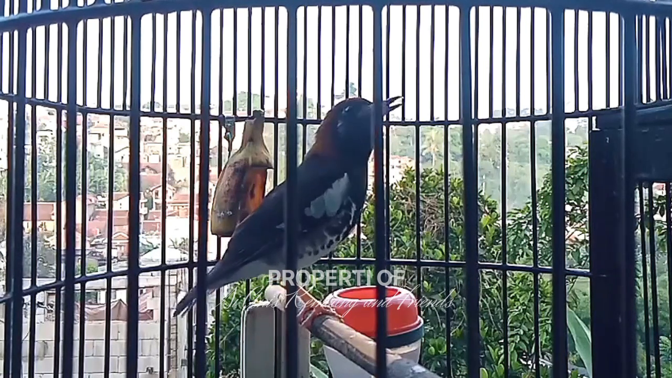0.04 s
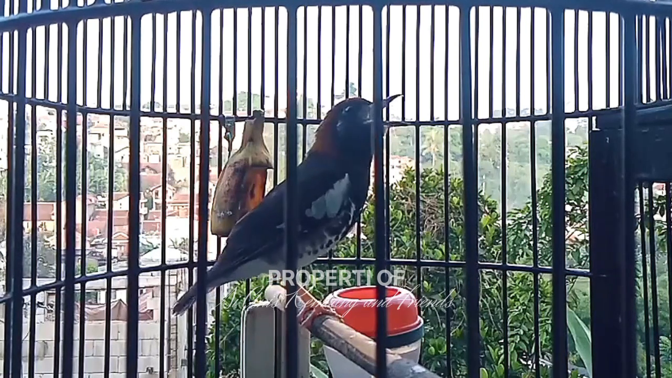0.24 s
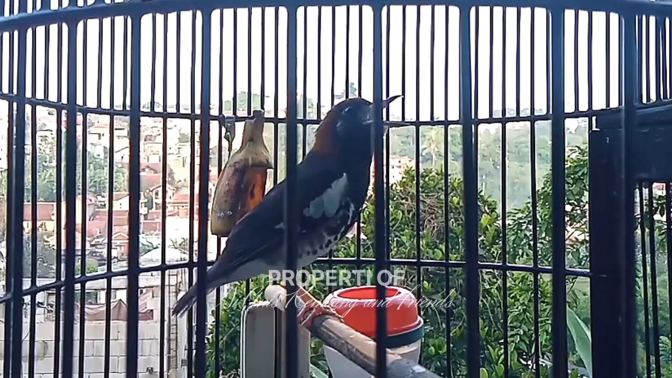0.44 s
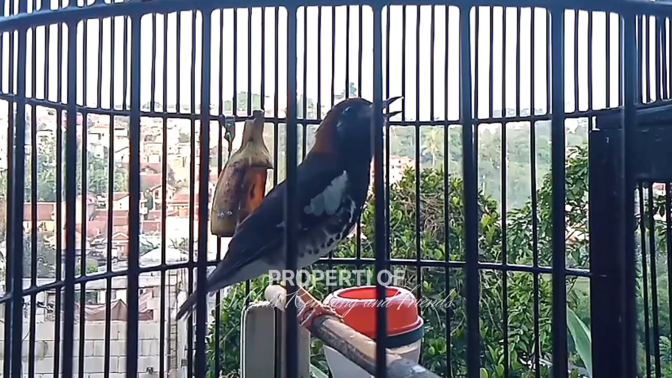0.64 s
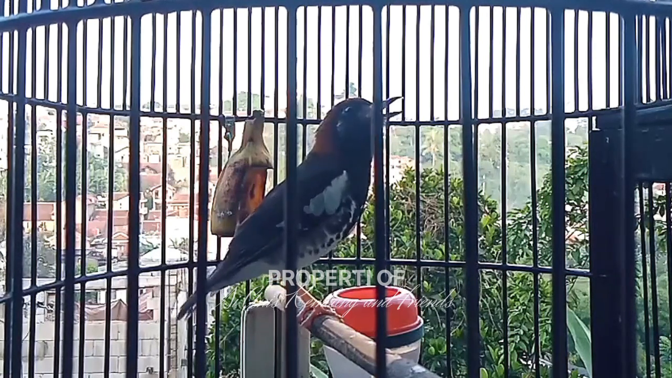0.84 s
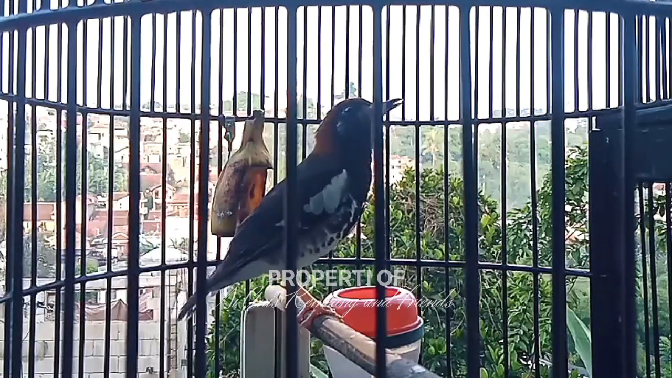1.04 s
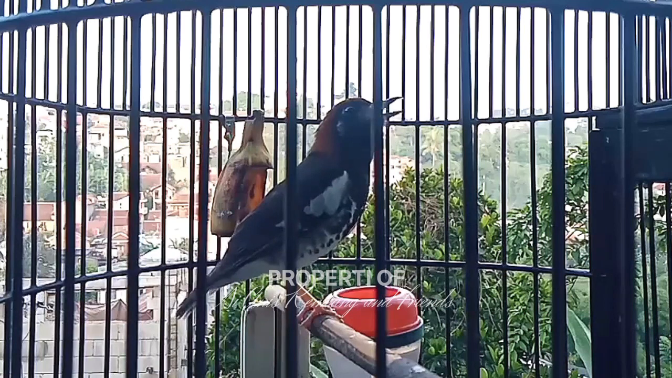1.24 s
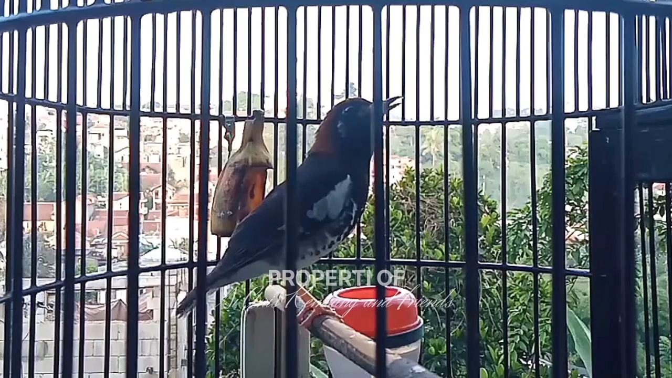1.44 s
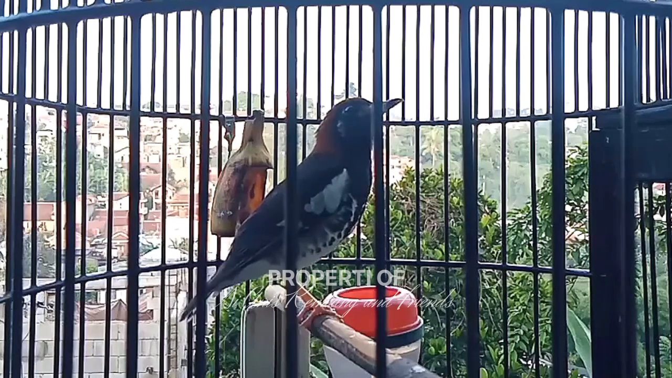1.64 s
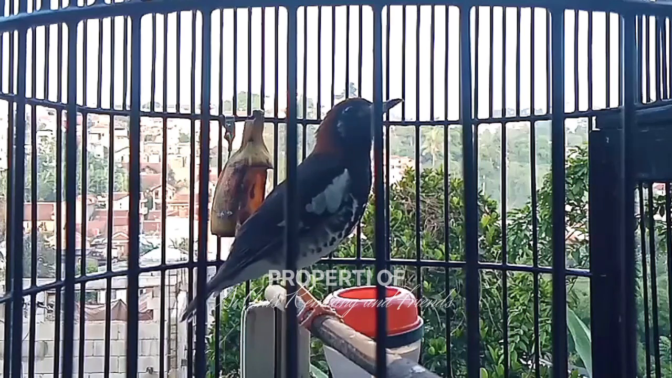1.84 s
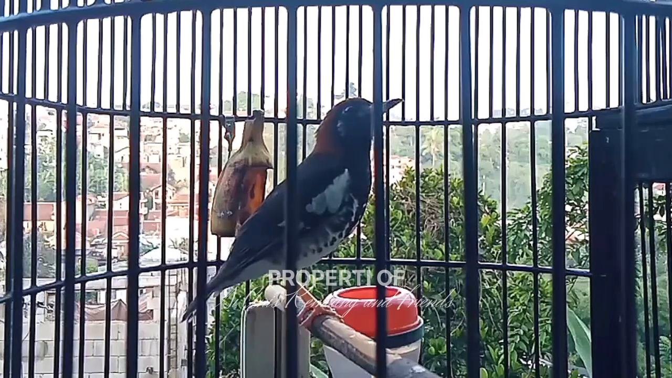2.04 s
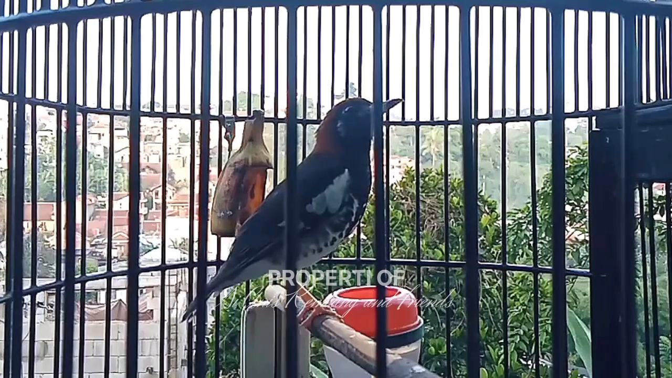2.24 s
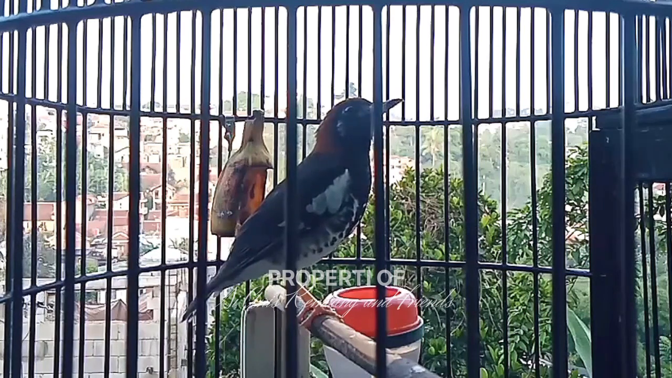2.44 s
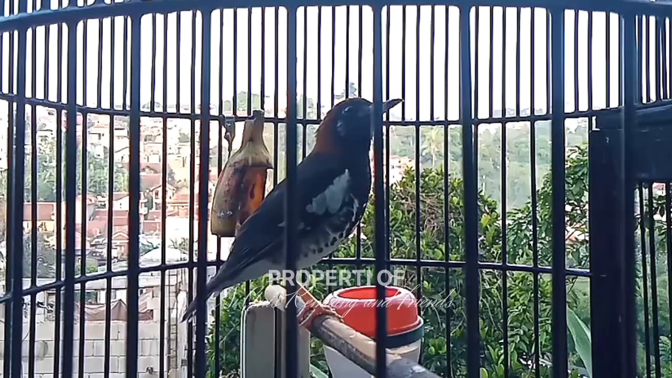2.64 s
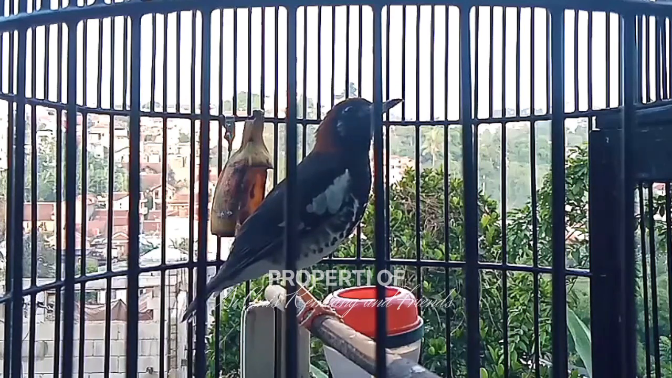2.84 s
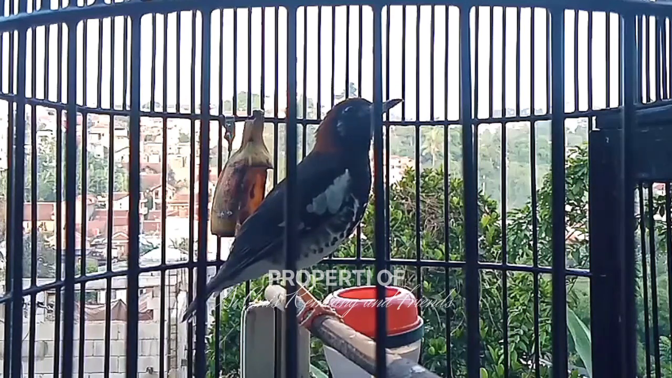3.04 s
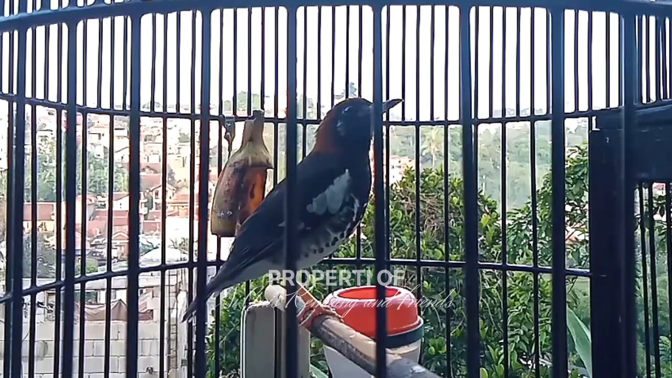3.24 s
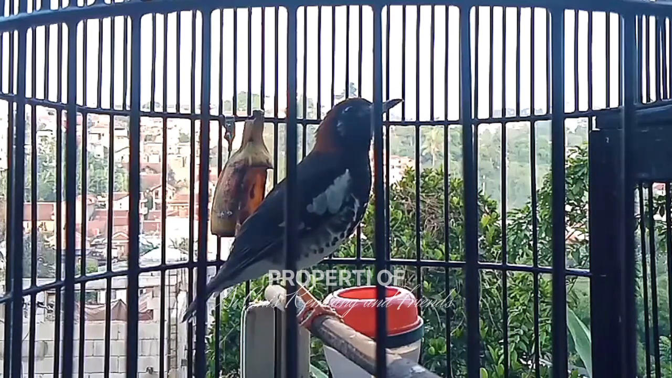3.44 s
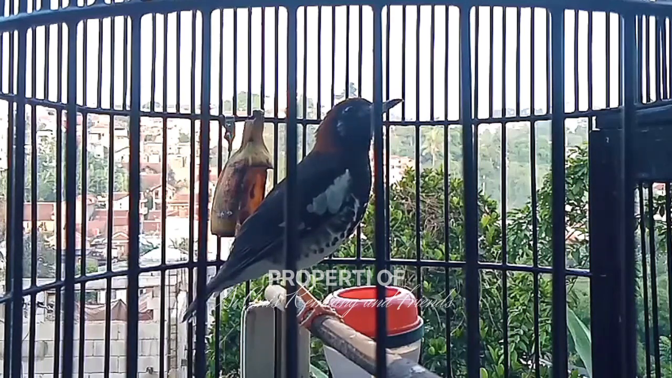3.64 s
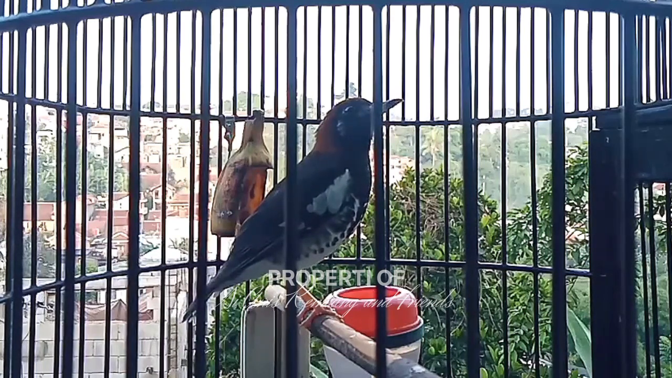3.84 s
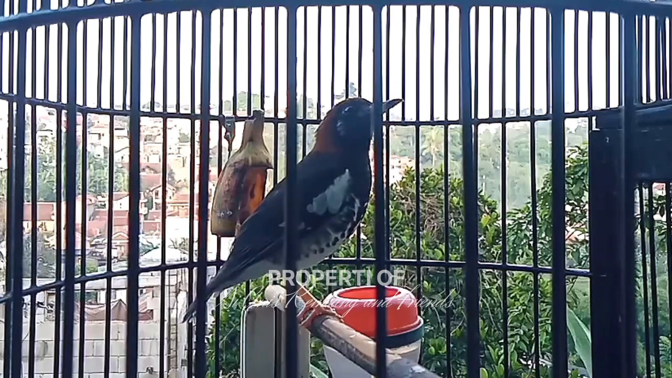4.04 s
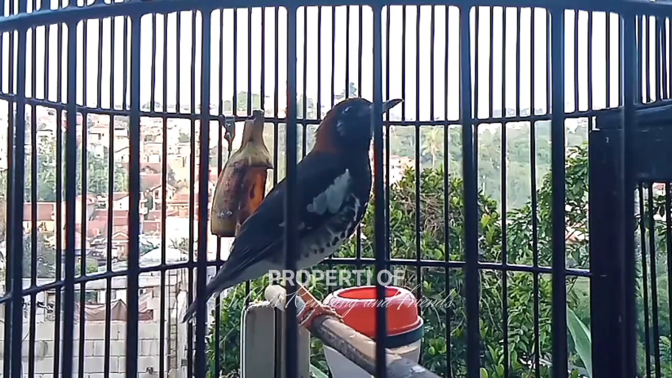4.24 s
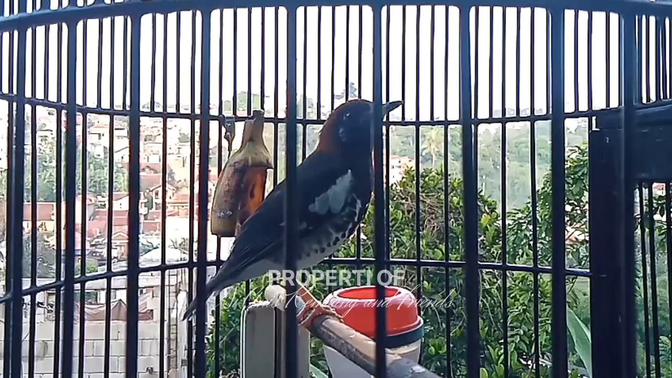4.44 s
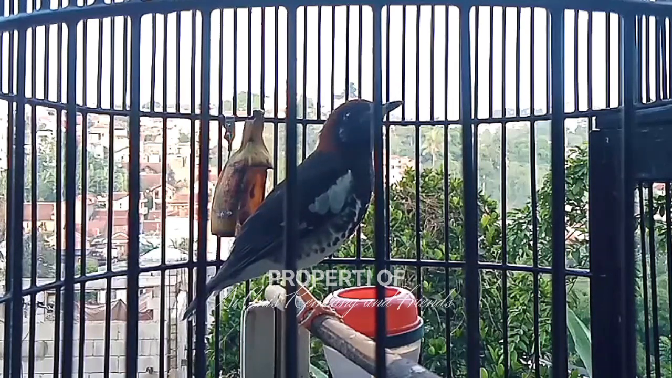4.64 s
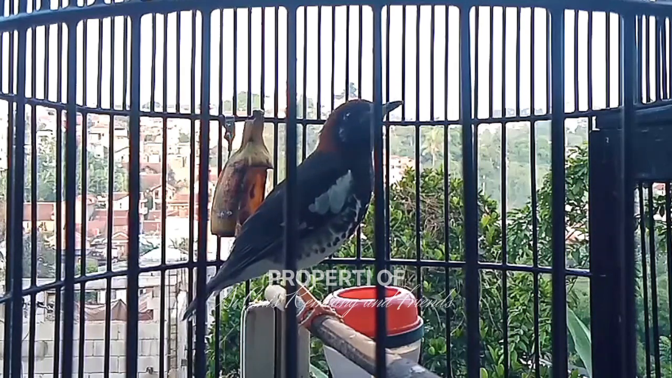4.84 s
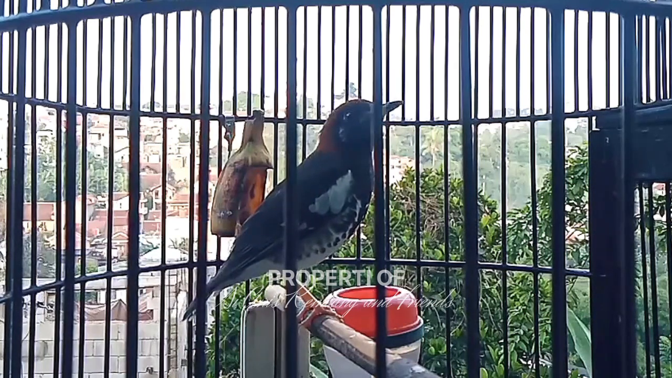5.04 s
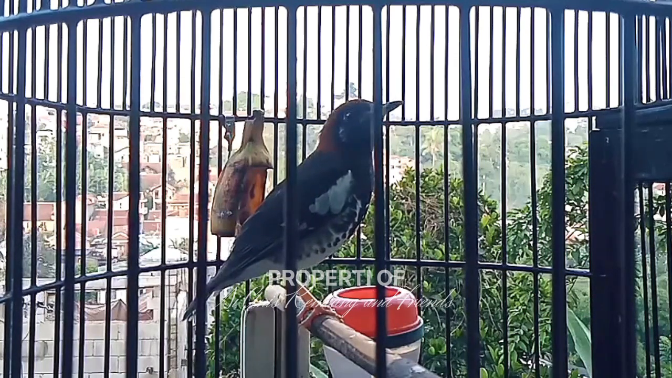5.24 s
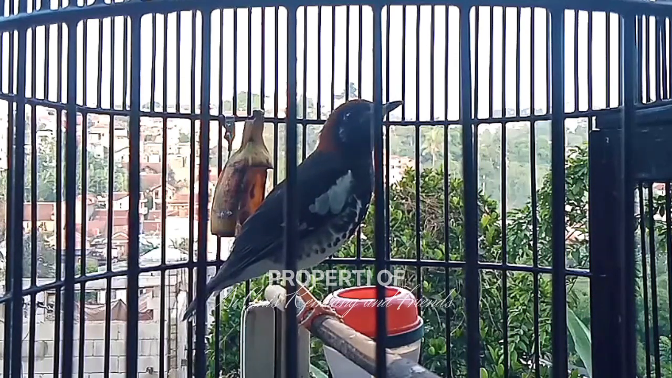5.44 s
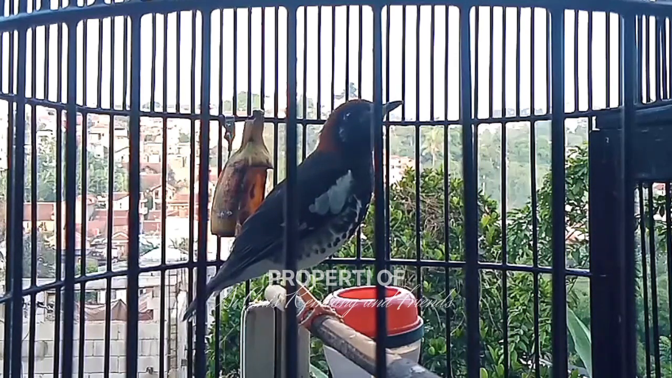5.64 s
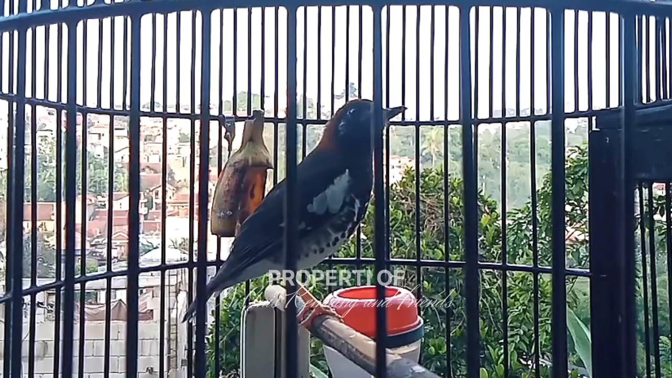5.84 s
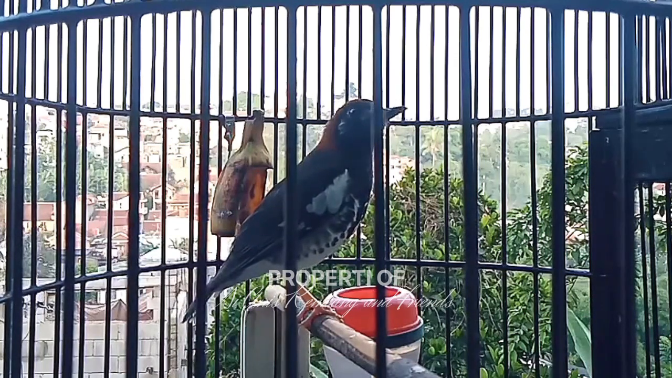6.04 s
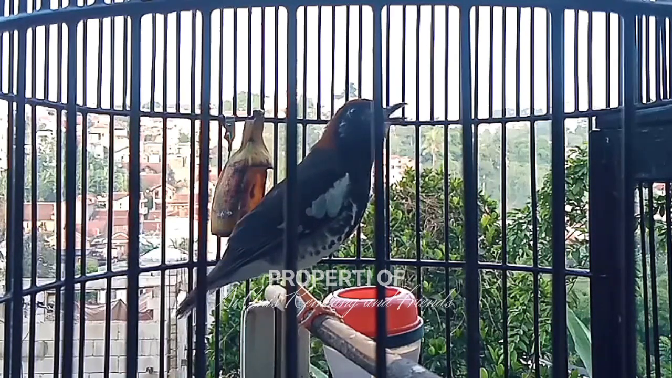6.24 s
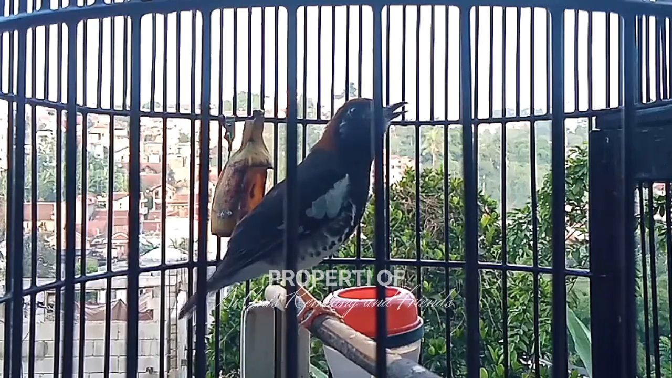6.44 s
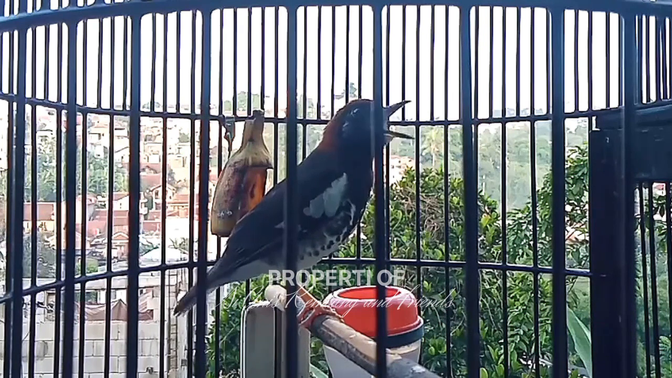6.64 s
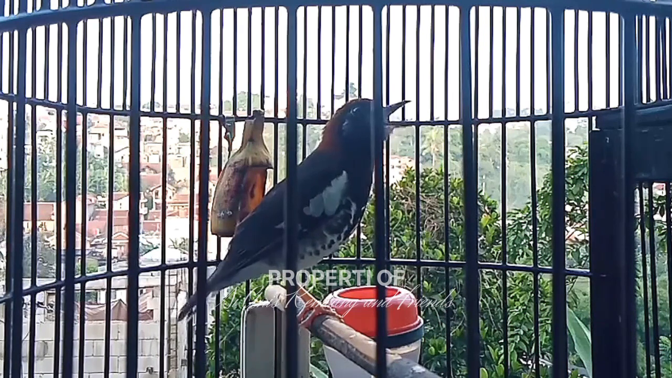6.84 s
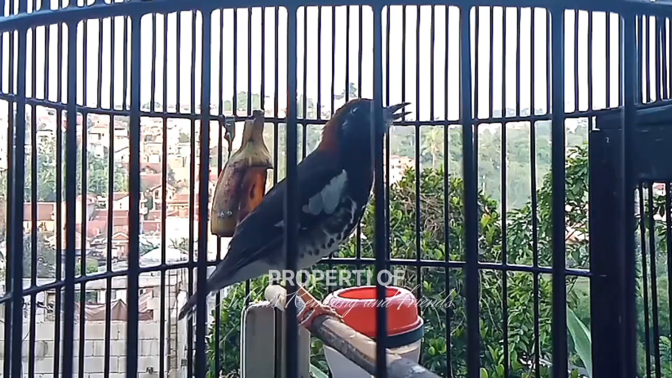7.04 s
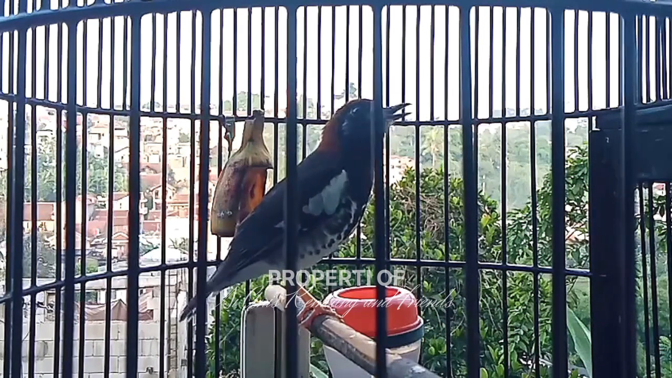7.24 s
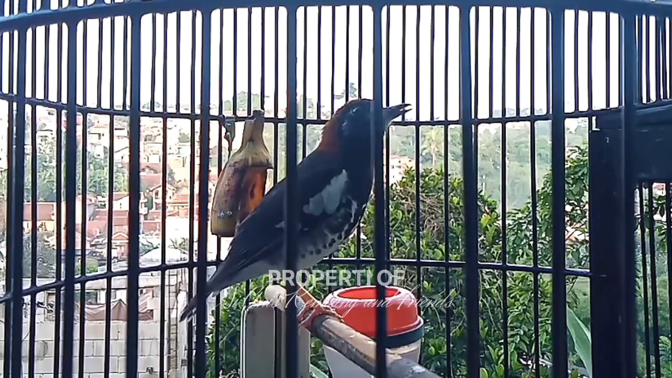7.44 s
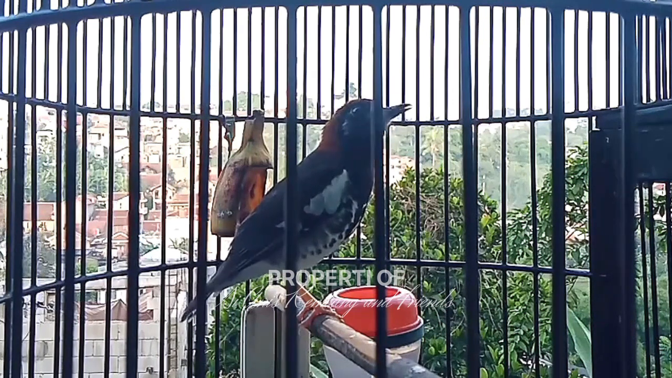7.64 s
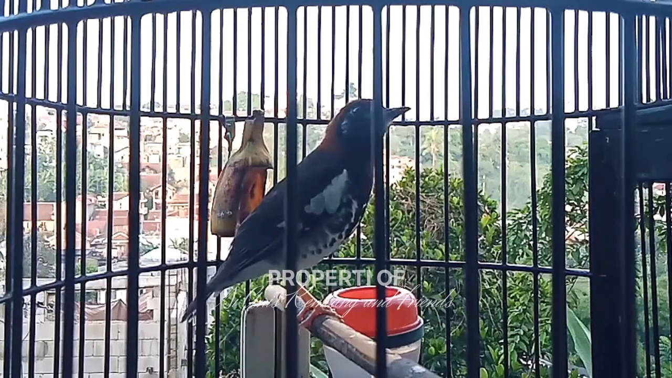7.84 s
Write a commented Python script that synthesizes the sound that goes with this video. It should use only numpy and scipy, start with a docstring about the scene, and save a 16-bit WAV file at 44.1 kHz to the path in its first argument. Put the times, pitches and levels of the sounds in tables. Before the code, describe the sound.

Close, bright songbird phrases stand far above a quiet town background. The first phrase is pure mid-high whistles with a short buzzy rasp; a long pause reveals muffled distant rooster crowing, weak twitter and low traffic rumble, ducked whenever the bird is loud. The second phrase starts with a strong descending whistle and continues with six clipped rising chips. Slight balcony echoes, outdoor air, automatic level control.

```python
"""Caged thrush above a town

A caged thrush sings close by on a balcony: slurred whistles, a two-voiced note, a rasp, then six rising chips.
Each side of its voice organ, the syrinx, makes a nearly pure tone from a sine with faint overtones.
Roosters, made of stacked harmonics, crow far off over the hum of traffic, which is shaped noise.
The recorder's gain control ducks the background under every loud note.
"""
import sys
import numpy as np
from scipy import signal
from scipy.fft import rfft, irfft, next_fast_len
from scipy.io import wavfile
from scipy.ndimage import uniform_filter1d, minimum_filter1d

SR = 44100
rng = np.random.default_rng(int(sys.argv[2]) if len(sys.argv) > 2 else 0)


def put_to_file(sound):
    """Save the sound as 16-bit audio at rate SR, in the file named by the first command-line argument."""
    columns = np.atleast_2d(sound).T  # one column per channel
    safe = np.clip(columns, -1, 1)
    whole_steps = np.round(safe * 32767)
    wavfile.write(sys.argv[1], SR, whole_steps.astype(np.int16))


N = 348371
TIME = np.arange(N) / SR

# Spectrum of the town noise, before its overall level is set: (frequency [Hz], level [dB per Hz])
TOWN_SPECTRUM = [(30, -33), (48, -25), (82, -0.5), (167, 5), (332, -7), (521, -7.5), (673, -9.5),
                 (1150, -14), (1970, -13.5), (2190, -18.5), (3020, -17), (3800, -22), (4400, -33),
                 (5200, -46), (7000, -58), (11100, -85)]
# Swells of the traffic: (middle [s], half length [s], rise [dB])
TRAFFIC_SWELLS = [(.1, 1.0, 3.2), (5.581, .78, 10), (8.17, .57, 12)]
# Far roosters, one row per syllable; distance swallows what lies above the top frequency:
# (start [s], length [s], pitch [Hz], slide [Hz/s], arch [share of pitch], time in low register [s],
#  level [dB], brightness [dB/octave], top frequency [Hz], hoarseness [0-1])
ROOSTER_SYLLABLES = [ (-.1, .74, 754, -40, .02, 0, -50.5, 10.5, 1696, .22),
                     (.758, .41, 711, -130, .02, 0, -64, 13, 1700, .2),
                     (2.41, .19, 893, 60, .015, 0, -65, 8, 2200, .2),
                     (2.68, .68, 903, -25, .025, 0, -59.5, 6.5, 2200, .2),
                     (3.24, .3, 832, -50, .01, 0, -54.5, -1, 1760, .15),
                     (3.38, .62, 817, -65, .008, 0, -62, 16, 1760, .08),
                     (3.92, .2, 700, -150, .02, .05, -51, 1, 2600, .55),
                     (4.265, .2, 752, -30, .07, .025, -41.5, -3.5, 3050, .2),
                     (4.53, .49, 706, -40, .015, .07, -45.5, -2.5, 3100, .5),
                     (5.15, .26, 534, -70, .025, 0, -40, -10.5, 2490, .16),
                     (5.901, 1.26, 688.5, 5, .02, 0, -65, 13.5, 1397, .24),
                     (6.15, .3, 571, -50, .02, 0, -50, -18.5, 1600, .13)]
# Resonances of the rooster's throat: (frequency [Hz], level [dB])
THROAT_SPECTRUM = [(500, 0.5), (780, -2.5), (1100, -4), (1450, -2), (1800, -3.5), (2100, -13), (2250, -6),
                   (2500, -17), (2800, -4), (3700, -27.5)]
# Small birds far off in the trees: (start [s], length [s], start pitch [Hz], end pitch [Hz], level [dB])
FAR_CHIRPS = [(1.98, .2, 3200, 2750, -67), (2.22, .16, 3250, 3000, -61), (2.83, .055, 3950, 2850, -62),
              (3.55, .06, 3750, 3300, -66), (4.24, .05, 4550, 4000, -62), (5.04, .14, 3200, 3130, -53.5),
              (5.36, .05, 3500, 3380, -56), (5.82, .08, 3050, 2900, -59)]
# Echoes off the balcony's walls and roof: (delay [s], level [dB])
BALCONY_ECHOES = [(.0052, -23), (.0112, -12.5), (0.0187, -18)]
# Thrush whistles, each a straight slide entered by a scoop and closed by a fall:
# (start [s], length [s], side of the syrinx, pitch [Hz], slide [Hz/s], scoop [Hz], scoop time [s],
#  fall time [s], opening level [dB], attack time [s], peak level [dB], decay time [s], held level [dB],
#  late swell [dB], overtones [dB])
WHISTLE_NOTES = [ (-.003, .198, "low", 2292, -2113, -89, .044, .027, -11, .045, 5, .13, -10, 0, -38),
                 (.314, .147, "low", 2880, -40, 16, .02, .002, -16, .048, .3, .08, -2.8, 1, -41),
                 (.555, .075, "low", 3480, 0, 100, .018, .008, -8, .036, 4.2, .058, 3, 0, -54),
                 (.688, .103, "low", 2710, 60, -160, .014, .003, -13, .036, 1.5, .04, 5, 0, -58),
                 (.908, .096, "low", 2655, 523.5, -150, .012, .014, -12, .033, 4.5, .03, -4.5, 5, -49),
                 (1.395, .281, "low", 2403, -620, 83, .027, .064, -20, .042, -3.5, .05, -12.3, 3.5, -33.5),
                 (6.303, .285, "low", 2431, -1508, 842, .065, .0033, -12, .028, 4, .06, -7, 1, -53),
                 (.299, .129, "high", 3780, -1500, -178, .0054, .0086, -8, .037, 4, .028, -9.5, 0, -41),
                 (1.083, .064, "high", 4937, -19000, 100, .01, .002, -23, .014, -18, .022, -25, 0, -33)]
# Rising chips of the low side: (start [s], length [s], start pitch [Hz], top pitch [Hz], rise time [s], level [dB])
CHIP_NOTES = [(6.714, .047, 2276, 3235, .003, 4.5), (6.866, .043, 2440, 3255, .0036, 5),
              (7.044, .041, 2500, 3330, .004, 3), (7.266, .035, 2050, 3370, .0058, -.7),
              (7.458, .034, 1750, 3400, .0053, -1), (7.644, .035, 1800, 3650, .0048, 2)]
# Thin falling answer of the high side as each chip ends:
# (start [s], length [s], start pitch [Hz], end pitch [Hz], level [dB])
ANSWER_NOTES = [(6.741, .069, 4650, 4130, -9), (6.888, .073, 4660, 4130, -10.5),
                (7.065, .064, 4780, 4270, -9.5), (7.281, .074, 5270, 4900, -24),
                (7.491, .045, 5330, 5110, -22), (7.673, .05, 5400, 5160, -21.5)]
# Hoarse bursts, mostly where a note breaks in: (start [s], length [s], level [dB], treble sizzle [dB])
RASP_BURSTS = [(.312, .118, -36, -69), (1.08, .055, -55, -54), (1.121, .026, -24.5, -50),
               (1.395, .007, -40, -70), (6.303, .035, -39, -75)]
# Strength of each overtone of a syrinx side: (multiple of the pitch, level [dB])
OVERTONES = [(2, 8.5), (3, 0), (4, -12.5), (5, -11)]
# Colour the beak gives to the overtones: (frequency [Hz], level [dB])
BEAK_SPECTRUM = [(3000, 5), (4200, -1), (5000, -5), (6500, -8.5), (8200, -22), (9600, -14.5), (10700, -12),
                 (12000, -9), (13000, -30), (15000, -28)]
# Sharp ticks heard with some of the notes: (time [s], level [dB], lowest frequency [Hz], top frequency [Hz])
TICK_SPIKES = [(.303, -3, 3000, 6000), (.306, -3, 4000, 8000), (.558, -7, 3500, 6000),
               (.572, 2, 3500, 6200), (.909, -21, 3000, 7500), (1.093, -22, 3000, 11000),
               (6.73, -8, 3000, 10000), (7.662, 15.5, 200, 15800)]

CUTOFF_HZ = 15900   # nothing is kept above this
TRAFFIC_DB = -56.5   # steady hum of the town
CHATTER_DB = -70   # still fainter chirps of the far flock
CROW_FADE_POWER = 0.55   # a syllable is fainter at both ends
# A forced syllable starts low and breaks upward; at full hoarseness it drops back for RELAPSE_RATIO times as long
LOW_REGISTER_HZ, BREAK_S, RELAPSE_RATIO = 558, .006, 4.2
LOW_REGISTER_LEFT = .7   # share of the low register that rattles on under the high one at full hoarseness
WARBLE_PER_S, WARBLE_HZ, WARBLE_FADE_S = 24, 55, .08   # the high side's pitch warbles, then settles
OPEN_S, CLOSE_S = .007, .011   # the syrinx opens faster than it closes
LATE_SWELL_S = .016   # width of the late swell just before a whistle falls
PURITY_DB_PER_DB = 0.71   # the stronger a whistle, the fainter its overtones beside it
# As the membrane slackens, pitch and strength drop together, the pitch wobbles and the overtones fade
FALL_HZ_PER_S, FALL_KNEE_S, FALL_WOBBLE = 14500, 0.0076, .07
FALL_DIMS_DB_PER_HZ, FALL_DULLS_DB_PER_HZ = .0175, .004


def from_db(db):
    """Turn decibels into a gain."""
    return 10 ** (np.asarray(db) / 20)


def rms_one(x):
    """Scale a sound to unit power."""
    return x / np.sqrt(np.mean(x ** 2) + 1e-20)


def at_hz(points, hz):
    """Read the level of a spectrum at any frequency, along an axis where octaves are equally wide."""
    f, db = np.transpose(points)
    return np.interp(np.log(np.maximum(hz, 1)), np.log(f), db)


def coloured(x, spectrum):
    """Shape a sound by a spectrum."""
    hz = np.arange(N // 2 + 1) * SR / N
    return irfft(rfft(x) * from_db(at_hz(spectrum, hz)), N)


def band(x, low_hz, high_hz, order=2):
    """Let through mainly the frequencies between two limits."""
    edges = [low_hz, min(high_hz, SR / 2 - 1)]
    return signal.sosfilt(signal.butter(order, edges, "band", fs=SR, output="sos"), x)


def drift(rate):
    """Random wander of spread 1, up to about rate turns a second."""
    size = next_fast_len(N)
    f = np.arange(size // 2 + 1) * SR / size
    slow = rfft(rng.standard_normal(size)) / (1 + (f / rate) ** 2)
    return rms_one(irfft(slow, size)[:N])


def during(start, end):
    """The samples between two times, and how far through each one is (0-1)."""
    at = np.flatnonzero((TIME > start) & (TIME < end))
    return at, (TIME[at] - start) / (end - start)


def tail(x, t60, build_s):
    """Reverberation: dense reflections build up, then die away by 60 dB in t60 seconds."""
    t = TIME[:SR]
    response = rng.standard_normal(SR) * from_db(-60 * t / t60) * (1 - np.exp(-t / build_s))
    return signal.fftconvolve(x, response / np.linalg.norm(response))[:N]


def traffic_db():
    """Level of the traffic: a steady hum with broad, flat-topped swells."""
    swells = sum(db / (1 + ((TIME - middle) / half_s) ** 8) for middle, half_s, db in TRAFFIC_SWELLS)
    return TRAFFIC_DB + swells


def town(patchy_db=3.1, brighten=.035, hiss_db=-85, hiss_follows=.15, count=9):
    """Dull noise of far traffic, brighter as it swells; every octave also wavers on its own."""
    spectrum = rfft(rms_one(coloured(rng.standard_normal(N), TOWN_SPECTRUM)))
    hz = np.arange(N // 2 + 1) * SR / N
    octave = np.log2(np.clip(hz / 40, 1, 2 ** (count - 1)))   # octaves above 40 Hz
    level_db = traffic_db()
    swell_db = level_db - level_db.mean()
    noise = 0
    for k in range(count):
        part = irfft(spectrum * np.maximum(1 - abs(octave - k), 0), N)
        noise = noise + part * from_db(patchy_db * drift(12) + brighten * (k - 3.5) * swell_db)
    hiss = band(rng.standard_normal(N), 1000, 12000)
    return from_db(level_db) * noise + from_db(hiss_db + hiss_follows * swell_db) * hiss


def roosters(count=5):
    """Arched calls of a few harmonics that may break between two registers; hoarseness shakes pitch and
    strength, and each harmonic fades in and out on the way."""
    out, shake, rattle = np.zeros(N), drift(220), drift(110)
    fading = [from_db(3.5 * drift(30)) for _ in range(count)]
    for start, length, hz, slide, arch, low_s, db, brightness_db, top_hz, hoarse in ROOSTER_SYLLABLES:
        at, u = during(start, start + length)
        t = u * length
        pitch = (hz + slide * (t - length / 2)) * (1 - arch * (2 * u - 1) ** 2)
        gain = from_db(db) * np.sin(np.pi * u) ** CROW_FADE_POWER * (1 + 0.6 * hoarse * rattle[at])
        registers = [(pitch, gain)]
        if low_s > BREAK_S:
            since_break = t - low_s
            until_relapse = length - t - RELAPSE_RATIO * hoarse * low_s
            high = .5 + .5 * np.tanh(np.minimum(since_break, until_relapse) / BREAK_S)
            low = 1 - high + LOW_REGISTER_LEFT * hoarse ** 2 * high
            registers = [(pitch, gain * high), (LOW_REGISTER_HZ, .7 * gain * low)]
        for voice_hz, voice_gain in registers:
            phase = 2 * np.pi * np.cumsum(voice_hz * (1 + .06 * hoarse * shake[at])) / SR
            for k in range(1, count + 1):
                throat = from_db(at_hz(THROAT_SPECTRUM, k * voice_hz) + brightness_db * np.log2(k))
                air = 1 / (1 + (k * voice_hz / top_hz) ** 10)   # distance takes the treble
                out[at] += voice_gain * throat * air * fading[k - 1][at] * np.sin(k * phase)
    return out


def chatter(count=40):
    """Short falling chirps at random times and pitches."""
    draws = rng.uniform([0, .03, 2900], [N / SR, .08, 3900], (count, 3))
    return [(start, length, hz, .85 * hz, CHATTER_DB) for start, length, hz in draws]


def far_birds(chirp_direct_db=-10, chirp_echo_db=0):
    """Crows and twittering chirps, blurred by their way across the valley; chirps arrive mostly as echoes."""
    crows = roosters()
    chirps = slurs(FAR_CHIRPS + chatter(), purity=0)
    twitter = syrinx_side(chirps, jitter=.04, shimmer=.6, unrest_per_s=170)
    far_crows = crows + from_db(-10) * tail(crows, t60=.5, build_s=.02)
    twitter_echo = tail(twitter, t60=.3, build_s=.008)
    return far_crows + from_db(chirp_direct_db) * twitter + from_db(chirp_echo_db) * twitter_echo


def balcony(x, room_db=-18, late_db=-36):
    """A few distinct echoes, a short ring, and a faint return from the houses."""
    echoes = 0
    for delay, db in BALCONY_ECHOES:
        echoes = echoes + from_db(db) * np.interp(TIME - round(delay * SR) / SR, TIME, x, left=0)
    ring = from_db(room_db) * tail(x, t60=.25, build_s=.006)
    houses = from_db(late_db) * tail(x, t60=.45, build_s=.03)
    return x + echoes + band(ring + houses, 800, 13000, order=1)


def ticks():
    """Each tick is a single sharp spike that rings for a moment."""
    spikes = 0
    for start, db, low_hz, top_hz in TICK_SPIKES:
        spike = from_db(db) * signal.unit_impulse(N, round(start * SR)) + 1e-18
        spikes = spikes + band(spike, low_hz, top_hz)
    return band(spikes, 3700, 6300, order=1) + from_db(-15.5) * band(spikes, 1000, 15000, order=1)


def rasps(top_db=-25):
    """The membrane briefly vibrates chaotically, heard as noise with a fainter sizzle at 8 to 9 kHz."""
    white, out = rng.standard_normal(N), np.zeros(N)
    core = rms_one(band(white, 2950, 4370, order=3))
    hoarse = core + from_db(top_db) * rms_one(band(white, 1500, 10000, order=4))
    sizzle = rms_one(band(rng.standard_normal(N), 7900, 9300, order=3))
    for start, length, db, sizzle_db in RASP_BURSTS:
        at, u = during(start, start + length)
        noise = from_db(db) * hoarse[at] + from_db(sizzle_db) * sizzle[at]
        out[at] += np.sin(np.pi * u) ** .7 * noise
    return out


def combination_tones(low, high, sum_db=-40, upper_db=-19, lower_db=-25):
    """When both sides sound at once they modulate each other, adding rough tones at mixtures of their pitches."""
    a, b = signal.hilbert([low, high], next_fast_len(N))[:, :N]   # gives strength and phase
    both = abs(a * b) / (abs(a) + abs(b) + .01)
    low_phase, high_phase = np.angle(a), np.angle(b)
    tones = (from_db(sum_db) * np.cos(low_phase + high_phase)
             + from_db(upper_db) * np.cos(2 * high_phase - low_phase)
             + from_db(lower_db) * np.cos(2 * low_phase - high_phase))
    return both * tones * (1 + .2 * drift(60))


def slurs(table, overtone_db=-44, purity=.55, droop=.025):
    """Notes swell in softly while the pitch tips over, falls, levels off and flicks down; with purity
    above zero, strong notes are purer."""
    for start, length, start_hz, end_hz, db in table:
        at, u = during(start, start + length)
        pitch = (end_hz + (start_hz - end_hz) * np.cos(np.pi / 2 * u) ** 3.2) * (1 - droop * u ** 16)
        yield at, pitch, from_db(db) * np.sin(np.pi * u ** 1.5), overtone_db - purity * db


def chips(droop=.15, creep=.04, overtone_db=-41, purity=1.8):
    """The pitch shoots up to its top, creeps higher and sags as the note closes; strong chips are purer."""
    for start, length, start_hz, top_hz, rise, db in CHIP_NOTES:
        at, u = during(start, start + length)
        shoot = top_hz - (top_hz - start_hz) * np.exp(-u * length / rise)
        pitch = shoot * (1 + creep * (u - .5) - droop * u ** 7)
        swell = np.sin(np.pi * u) * (.6 + .4 * np.exp(-((u - .52) / .24) ** 2))
        yield at, pitch, from_db(db) * swell, overtone_db - purity * db


def whistles(side, warble_hz=0):
    """Pitch scoops onto a slide and falls unsteadily at the close; level swells, moves to a held value,
    may swell once more and dims with the fall."""
    wobble = drift(150)
    for (start, length, own_side, hz, slide, scoop_hz, scoop_s, fall_s, open_db, attack_s,
         peak_db, decay_s, held_db, late_swell_db, overtone_db) in WHISTLE_NOTES:
        if own_side != side:
            continue
        at, u = during(start, start + length)
        t = u * length
        past_knee = t - length + fall_s   # time since the fall set in
        scoop = scoop_hz / (1 + (t / scoop_s) ** 3)
        smooth_fall = FALL_HZ_PER_S * FALL_KNEE_S * np.logaddexp(0, past_knee / FALL_KNEE_S)
        fall = smooth_fall * (1 + FALL_WOBBLE * wobble[at])
        warble = warble_hz * np.exp(-t / WARBLE_FADE_S) * np.sin(2 * np.pi * WARBLE_PER_S * t)
        pitch = hz + slide * t + scoop - fall + warble
        swell = np.sin(np.pi / 2 * np.minimum(t / attack_s, 1))
        decay = np.sin(np.pi / 2 * np.clip((t - attack_s) / decay_s, 0, 1)) ** 2
        late_swell = late_swell_db * np.exp(-(past_knee / LATE_SWELL_S) ** 2)
        db = open_db + (peak_db - open_db) * swell + (held_db - peak_db) * decay
        db = db + late_swell - FALL_DIMS_DB_PER_HZ * fall
        gate = np.sin(np.pi / 2 * np.clip(np.minimum(t / OPEN_S, (length - t) / CLOSE_S), 0, 1)) ** 2
        overtones = overtone_db - PURITY_DB_PER_DB * (db - held_db) - FALL_DULLS_DB_PER_HZ * fall
        yield at, pitch, gate * from_db(db), overtones


def syrinx_side(notes, jitter, shimmer, unrest_per_s, blur=.17):
    """One membrane: a sine with faint overtones, the higher the more blurred, unsteady in pitch (jitter)
    and strength (shimmer)."""
    out = np.zeros(N)
    waver = 1 + jitter * drift(unrest_per_s)
    flutter = 1 + shimmer * drift(unrest_per_s)
    smear = blur * drift(200)
    for at, pitch, gain, overtone_db in notes:
        phase = 2 * np.pi * np.cumsum(pitch * waver[at]) / SR
        wave = np.sin(phase)
        for k, own_db in OVERTONES:
            strength = from_db(overtone_db + own_db + at_hz(BEAK_SPECTRUM, k * pitch))
            audible = k * pitch < CUTOFF_HZ
            wave += strength * audible * np.sin(k * phase + (k - 1.5) ** 1.5 * smear[at])
        out[at] += np.sqrt(2) * gain * flutter[at] * wave
    return out


def thrush(air_db=-50):
    """Whistles are pure; the forceful chips and their answers are rougher and carry a little hiss."""
    low = syrinx_side(whistles("low"), jitter=.0026, shimmer=.02, unrest_per_s=100)
    high = syrinx_side(whistles("high", WARBLE_HZ), jitter=.003, shimmer=.06, unrest_per_s=120, blur=1)
    chip = syrinx_side(chips(), jitter=.007, shimmer=.03, unrest_per_s=220, blur=.7)
    answer = syrinx_side(slurs(ANSWER_NOTES), jitter=.0065, shimmer=.08, unrest_per_s=90, blur=3.5)
    force = uniform_filter1d(abs(chip) + abs(answer), SR // 500)
    air = from_db(air_db) * force * rms_one(band(rng.standard_normal(N), 2300, 6000))
    return low + high + chip + answer + combination_tones(low, high) + air + rasps()


def scene():
    """The near bird in front of the far town."""
    background = town() + far_birds()
    return (background + ticks() + balcony(thrush()))[None]


def gain_control(x, threshold_db=-18, share=0.46, release_db_per_s=70, attack_s=0.0053):
    """Loud sound pulls the gain down quickly; it creeps back in the pauses."""
    power = uniform_filter1d(x ** 2, SR // 500, axis=-1)
    level_db = 10 * np.log10(np.maximum(power, 1e-12))
    cut_db = share * np.maximum(level_db - threshold_db, 0)
    release_db = release_db_per_s * TIME
    held_db = np.maximum.accumulate(cut_db + release_db, axis=-1) - release_db
    r = np.exp(-1 / (attack_s * SR))
    return x * from_db(-signal.lfilter([1 - r], [1, -r], held_db))


def limiter(x, ceiling=0.98, size=200):
    """The gain ducks smoothly around any peak over the ceiling."""
    gain = minimum_filter1d(ceiling / np.maximum(abs(x), ceiling), size)
    return x * uniform_filter1d(gain, size)


def record(dry):
    """Gain control, a peak limiter and a steep top cut."""
    top_cut = signal.ellip(10, .1, 80, CUTOFF_HZ, fs=SR, output="sos")
    return signal.sosfilt(top_cut, limiter(gain_control(dry)))


dry = scene()
out = record(dry)
put_to_file(out)
```